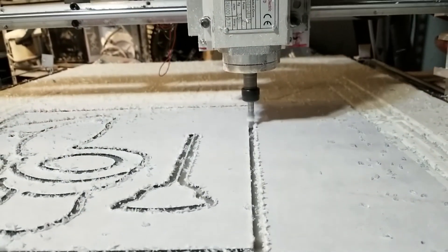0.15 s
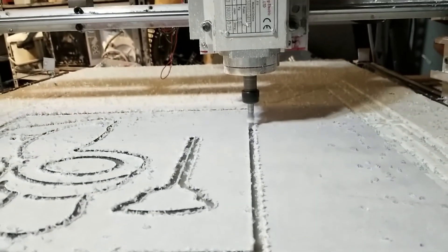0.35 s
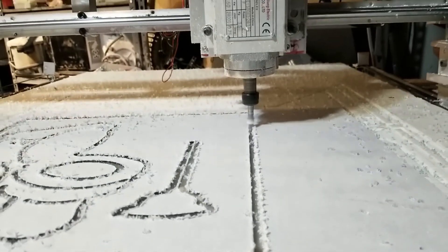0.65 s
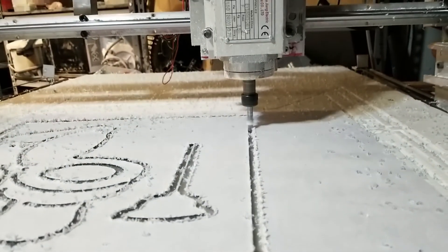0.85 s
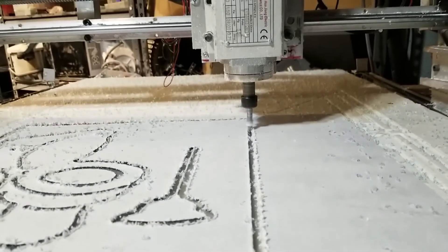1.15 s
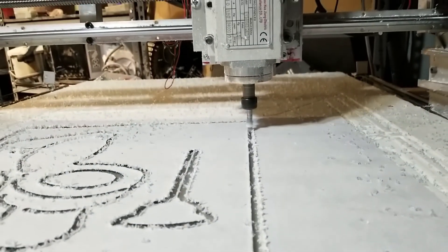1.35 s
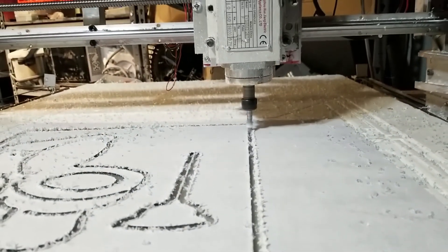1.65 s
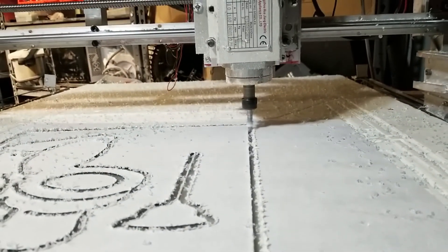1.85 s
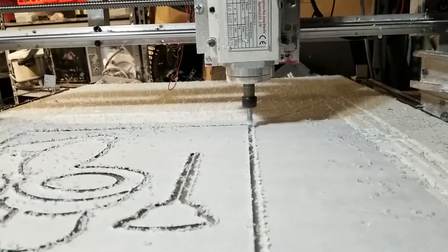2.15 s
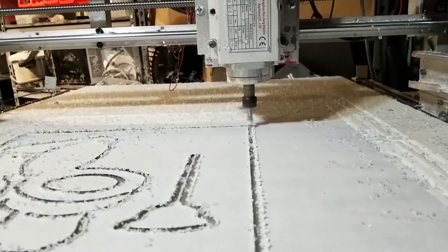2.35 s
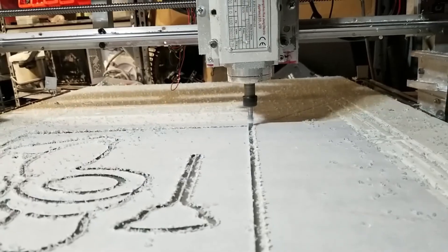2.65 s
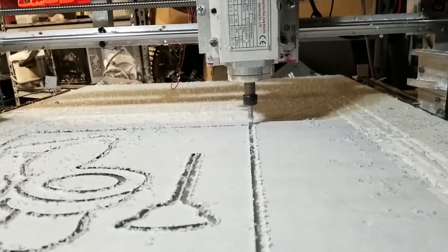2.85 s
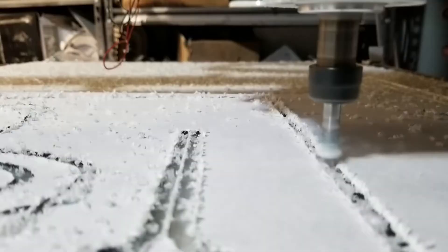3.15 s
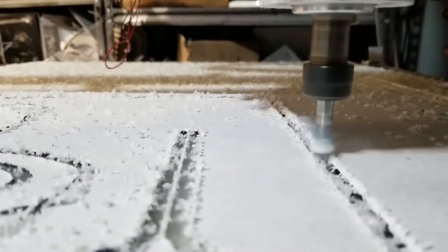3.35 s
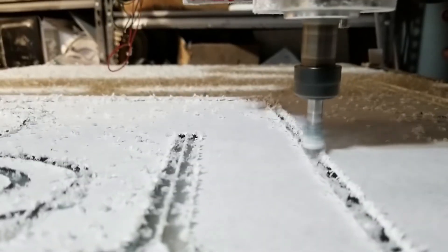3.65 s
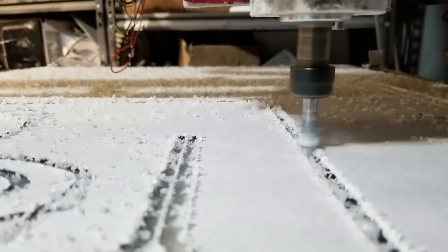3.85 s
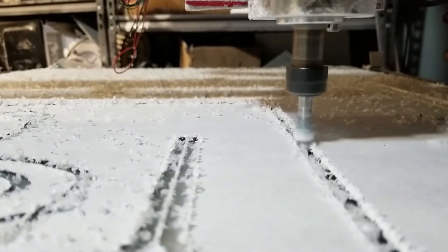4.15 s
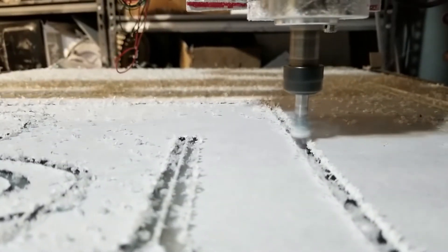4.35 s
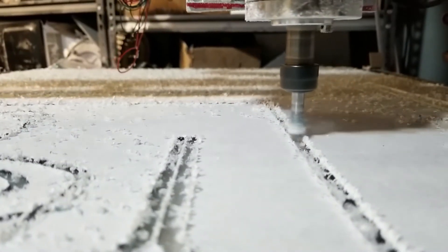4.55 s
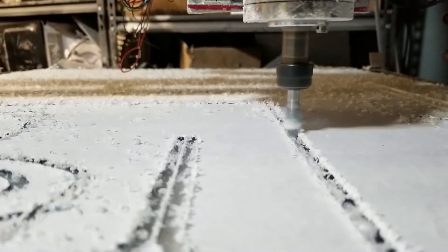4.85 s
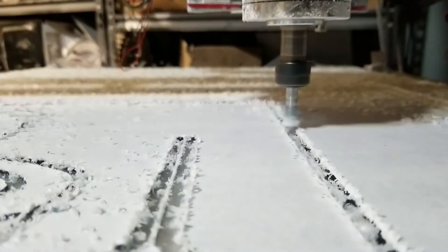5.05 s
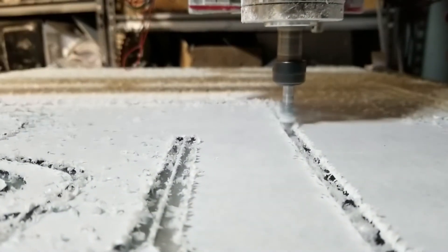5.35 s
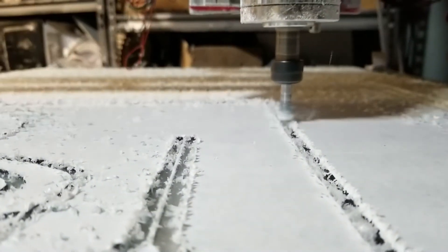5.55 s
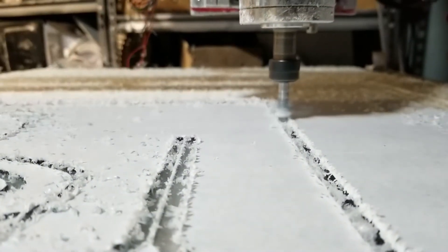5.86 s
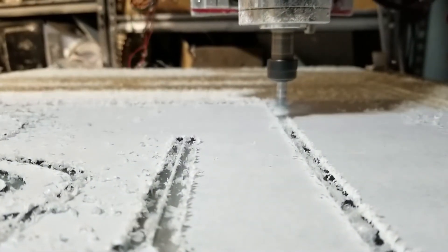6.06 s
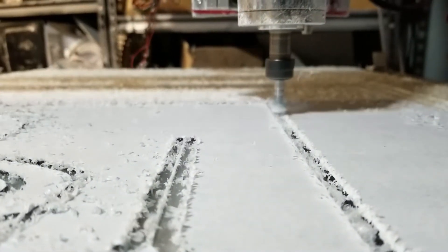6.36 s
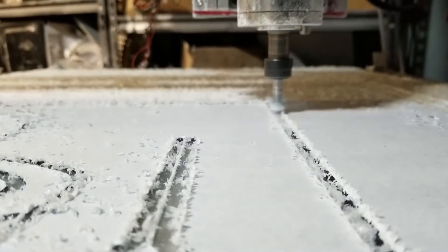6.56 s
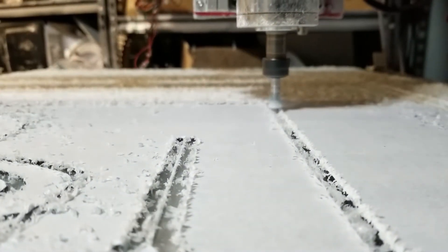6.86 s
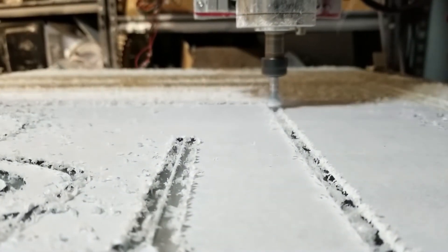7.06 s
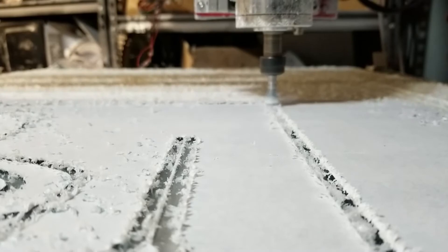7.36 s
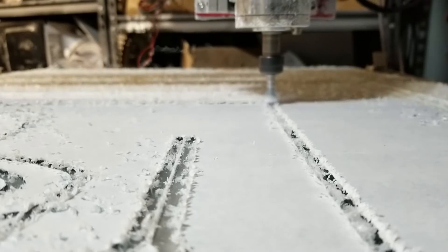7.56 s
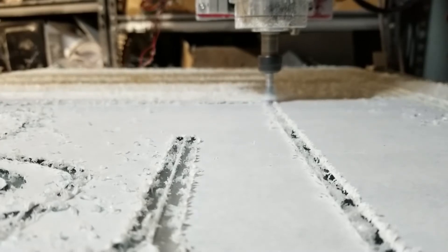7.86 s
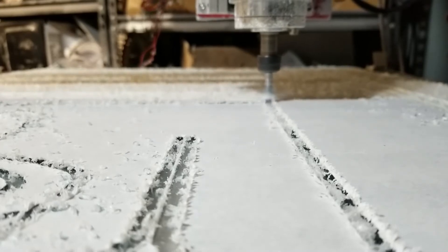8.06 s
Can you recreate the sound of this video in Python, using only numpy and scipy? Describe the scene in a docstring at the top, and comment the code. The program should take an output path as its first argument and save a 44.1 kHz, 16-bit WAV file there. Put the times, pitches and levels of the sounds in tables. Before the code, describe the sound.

From 0 s, heard a step away, a milling spindle hums near 262 hertz and whines strongly near 1050, with weaker overtones. Over it the cutter tears plastic in a bright, sizzling hiss, strongest about 4 to 14 kilohertz, buzzing and shuddering some 40 times a second. Two bites near 0.7 s and scattered chip snaps around 0.9-1.2 s tick sharply. From 2.05 to 2.55 s hard bites come in a rapid crackle; the hiss collapses, the whine sinks and axis motors moan softly until 3 s. At 3.04 s the perspective jumps close: full hiss returns, crisper and steadier, with wavering squeals around 5-6 kilohertz, isolated snaps and a slowly growing whine. Frame rumble and cooling air continue below, in short workshop reverberation. From 7.75 s the cut eases through faint bites; hiss and whine drop, leaving low moans, a small squeak at 8 s and thin ringing.

```python
"""Router milling a plastic panel

A CNC router mills a groove in a plastic panel in a small workshop, heard from a step away and then close by.
The turning spindle hums and whines in harmonics. Once per turn the cutter tears off a chip: a burst of
filtered noise, which surges as the gantry shudders, while modes of cutter and panel edge squeal.
Twice the cutter reaches a corner: it takes a few last bites, the hiss dies, axis motors and spindle moan.
Panel and frame resonate beneath, over cooling air and the short reverberation of the shop."""
import sys
import numpy as np
from scipy import signal
from scipy.fft import rfft, irfft, next_fast_len
from scipy.io import wavfile
from scipy.ndimage import uniform_filter1d

SR = 44100
rng = np.random.default_rng(int(sys.argv[2]) if len(sys.argv) > 2 else 0)


def unload_audio(sound):
    """Save the sound as a 16-bit wav file, at the path given as the first command line argument."""
    columns = np.transpose(np.atleast_2d(sound))
    # keep every value between -1 and 1, then stretch to whole-number steps
    steps = np.round(np.clip(columns, -1, 1) * 32767)
    wavfile.write(sys.argv[1], SR, steps.astype(np.int16))


N = 362502

TIME = np.arange(N) / SR
SIZE = next_fast_len(N)
BINS = np.maximum(np.arange(SIZE // 2 + 1) * SR / SIZE, 1)   # frequency of each bin, Hz
MOVE_CLOSE_S = 3.04   # the listening point jumps close to the cutter
SPEED_HZ, UNLOADED_RISE_HZ = (262.1, 262.85), 1.6   # turns per s under load (afar, close by); gain without load
CUTOFF_HZ, CEILING = 15750, .7


def tearing(angle, shake, surge=0.57, turn_db=(3.3, 2.2), decay_turns=0.2, rub=(.2, .36),
            second_flute=0.24, lead=0.33, thinnest=0.11, thickest=1.4):
    """Periodic cutting force: a burst per turn from the leading flute, a weaker one from the other, over rubbing."""
    quarter_period = round(SR / SHUDDER_HZ / 4)
    retreat = np.roll(shake, quarter_period)
    turns = np.maximum(angle - lead * retreat, 0) / (2 * np.pi)   # a retreating cutter meets the plastic later
    chance_per_turn = (2 * rng.random(N) - 1)[turns.astype(int)]
    strength = from_db(by_place(*turn_db) * chance_per_turn)
    leading = np.exp(-(turns % 1) / decay_turns)
    trailing = second_flute * np.exp(-((turns + .5) % 1) / decay_turns)
    chip_thickness = np.clip(1 + surge * shake * (1 - cornering()), thinnest, thickest)
    force = (by_place(*rub) + strength * (leading + trailing)) * chip_thickness
    return force / np.sqrt(uniform_filter1d(force ** 2, SR // 8))


# Colour of the chip noise. Each row: frequency in Hz, relative density in dB from afar, and close by.
CHIP_COLOUR = [(1320, -37, -21), (3100, -39, -6.5), (4330, -6.5, -5.5), (5180, -6.5, 3.5), (5900, -1, 1),
               (6850, -1, 3.5), (9100, 2, -0.5), (9160, 3.5, 5.5), (11780, 2.5, 4.5), (14200, -3.5, -4.5),
               (16200, -7, -8)]
HISS_LAG_S = (.000036, .000058)   # the hiss reaches the right side later (afar, close by)


def chips(force, hiss_db=4.0, patchy_db=3.0, grain_db=0.5, dust_db=10, slack_db=-8, crisp_hz=7800):
    """Amplitude-modulated noise: bands of hiss wander separately, pulsed by the force; fine dust brightens the top."""
    level_db, dust_tilt_db = cut_levels()
    far, close = (noise(colour(CHIP_COLOUR, axis=k + 1), lag_s=HISS_LAG_S[k], scatter=0.8) for k in range(2))
    hiss = by_place(rms_one(far), rms_one(close))
    spectrum = rfft(wandering(hiss), SIZE)
    centres, step = np.linspace(0, 16000, 13, retstep=True)
    steady, pulsed = 0, 0
    for hz in centres:
        triangle = np.maximum(1 - abs(BINS - hz) / step, 0)
        band = irfft(spectrum * triangle)[:, :N]
        top = np.clip((hz - 11000) / 3000, -.5, 1)
        band = band * from_db(patchy_db * drift(45) + top * (dust_tilt_db + dust_db))
        steady = steady + band
        sharpness = min((hz / crisp_hz) ** 2, 1)   # the highs crack with each chip, the mids just rub
        pulsed = pulsed + band * force ** sharpness
    running_rms = np.sqrt(uniform_filter1d(np.mean(steady ** 2, axis=0), SR // 20))
    evened = pulsed * from_db(grain_db * drift(1100)) / running_rms
    loudness = from_db(level_db + slack_db * cornering()) + bites()
    return evened * from_db(hiss_db) * loudness


# The straight cuts, one list from afar and one close by. Each row: time in seconds, base level of the chip
# hiss in dB, tilt of the fine-dust treble in dB before its swing is widened.
CUT_CURVES = [
    [(0.0, -23, -1), (0.17, -25.5, -2), (0.81, -22, -3.5), (0.87, -21.5, -3.5), (1.67, -25.5, -3.5),
     (1.9, -22.5, -7), (2.3, -23, -5), (2.39, -37, -6), (2.4, -32.5, -6)],
    [(3.07, -21.5, -2.5), (3.32, -24.5, -2.5), (4.96, -23.5, -3.5), (5.19, -24, -5), (5.44, -23.5, -4),
     (5.94, -26, -4), (6.05, -23, -3.5), (6.55, -23.5, -4), (7.2, -24.5, -4.5), (7.63, -27, -4.5),
     (7.72, -23.5, -4)],
]
CORNER_HISS_DB, CORNER_DUST_DB, PICK_UP_DB_PER_S = -19, -12, 28   # both fall in a corner; the hiss creeps back


def cut_levels(dust_swing=1.89, uneven_db=0.36):
    """Level envelopes in dB: hiss and dust fall in a corner, then the hiss creeps back; slight unevenness throughout."""
    level_db, dust_db = along_cuts(CUT_CURVES)
    free_s = by_place(*(np.clip(TIME - s - EASE_S, 0, .5) for s, _, _ in CORNERS))
    level_db = level_db + CORNER_HISS_DB * eased() + PICK_UP_DB_PER_S * free_s + uneven_db * drift(23.0)
    return level_db, dust_swing * dust_db + CORNER_DUST_DB * eased()


def wandering(x, wander_db=2.5, width_hz=560, hold_s=0.23, size=512):
    """Time-varying filtering: narrow bands of the hiss swell and fade as the cutter travels along the groove."""
    spectra = signal.stft(x, nperseg=size)[2]
    field = rng.standard_normal(spectra.shape[1:])
    spans = width_hz * size / SR, hold_s * SR / (size / 2)   # in bins and in frames
    for axis, span in enumerate(spans):
        for _ in range(2):
            field = uniform_filter1d(field, max(round(span), 1), axis=axis, mode="wrap")
    return signal.istft(spectra * from_db(wander_db * rms_one(field)), nperseg=size)[1][:, :N]


def chatter(x, overlap=0.62, hz=8000, width_hz=3800):
    """Regenerative comb filter: a flute recuts last turn's ripples, so mid hiss gathers between the harmonics."""
    one_turn_delay = np.exp(-2j * np.pi * BINS / np.mean(SPEED_HZ))
    recut = overlap * peak(hz, width_hz) * one_turn_delay
    return irfft(rfft(x, SIZE) * (1 - recut))[:, :N]


# Separate hard bites, most on the way into a corner. Each row: time in seconds, length in seconds,
# base peak level in dB, pitch in Hz.
HARD_BITES = [(0.6772, .012, -7, 7150), (0.7327, .008, -10, 6200), (2.0532, .013, -6, 9000),
              (2.2040, .012, -12, 9500), (2.2303, .009, -11, 9290), (2.2535, .012, -8, 9270),
              (2.2800, .008, -11, 8290), (2.3030, .012, -7, 9000), (2.3298, .012, -8, 10100),
              (2.3525, .012, -7, 7500), (2.3792, .009, -5, 8210), (2.4024, .011, -6, 9000),
              (2.4292, .015, -8, 7000), (2.4627, .007, -18, 7000), (2.4868, .011, -9, 9000),
              (2.5390, .008, -14, 7500), (7.7732, .012, -18, 8000), (7.8256, .013, -17, 8000),
              (7.8635, .009, -17, 8000), (7.9274, .007, -23, 8000)]


def teeth(strike_db=1.0, fade_db=0.5, uneven_db=0.5):
    """Repeated impact: during a bite the leading flute strikes once per turn, on average more weakly each time."""
    strikes = []
    for s, length_s, db, hz in HARD_BITES:
        for k in range(round(length_s * SPEED_HZ[0])):
            peak_db = db + strike_db - fade_db * k + uneven_db * rng.standard_normal()
            strikes.append((s + k / SPEED_HZ[0], peak_db, hz))
    return ticks(strikes, decay_s=0.0011, spread=0.29)


def bites(rub_db=-16, tail=1.0):
    """Asymmetric envelope: the rubbing in each bite starts hard and dies away more slowly."""
    total = 0
    for s, length_s, db, _ in HARD_BITES:
        attack = swell(s + 0.0022, 0.0022)
        decay = swell(s + 0.0016, tail * length_s)
        total = total + from_db(db + rub_db) * np.where(TIME < s + .002, attack, decay)
    return total


def cornering():
    """Gating: near 1 where the steady cut breaks up into separate bites, else 0."""
    return np.clip(sum(swell(s, .035) for s, *_ in HARD_BITES), 0, 1)


# Large chips snapping off. Each row: time in seconds, peak level in dB, pitch in Hz.
CHIP_SNAPS = [(0.875, -3, 11900), (1.013, -4, 9500), (1.017, -5, 8500), (1.113, -7, 8500),
              (1.163, -6, 8500), (1.191, -7, 8500), (1.2344, -9, 8270), (1.2383, -6, 8270),
              (1.8821, -9, 5590), (2.123, -5, 10000), (3.105, -3, 12500), (3.338, -9, 5700),
              (4.189, -3, 12000), (4.622, -4, 11100), (6.569, -8, 6070), (7.385, -9, 6190)]


def snaps():
    """Brittle fracture: a large chip breaks away with a short bright tick."""
    return ticks(CHIP_SNAPS, decay_s=.0007, spread=0.3)


LOWEST_CRACK_HZ = 5150   # the plastic cracks only above this


def ticks(rows, decay_s, spread):
    """Decaying band noise from rows of (s, peak dB, Hz); spread is the half bandwidth as a share of the pitch."""
    out, age = np.zeros((2, N)), TIME[:SR // 100]
    for s, db, hz in rows:
        edges = [max(hz / (1 + spread), LOWEST_CRACK_HZ), min(hz * (1 + spread), CUTOFF_HZ)]
        band = signal.butter(4, edges, "band", fs=SR, output="sos")
        both, *own = rng.standard_normal((3, len(age))) * np.exp(-age / decay_s)
        tick = signal.sosfilt(band, both + np.array(own))   # partly shared by the two sides
        at = round(s * SR)
        out[:, at:at + len(age)] += tick / abs(tick).max() * from_db(db)
    return out


# Modes of cutter and panel edge that squeal. Each row: frequency in Hz, split into a pair by plus and minus Hz,
# half width in Hz, level in dB from afar, level in dB close by, change in a corner in dB.
SQUEAL_MODES = [(5290, 0, 44, -40, -38, -7), (5624, -2, 85, -33, -32, -13), (6213, 130, 64, -37, -35, -12)]
# Flares as the cutter travels, one list per squealing mode. Each row: peak time in seconds,
# half length in seconds, added amplitude in dB.
SQUEAL_FLARES = [
    [(.77, .12, -42), (2.1, 0.087, -55), (6.75, 0.15, -34), (7.4, 0.57, -38)],
    [(.77, 0.067, -31), (2.1, 0.11, -39), (3.3, 0.098, -31), (5.0, 0.15, -35.5), (5.42, 0.096, -35),
     (6.17, 0.34, -37), (7.4, 0.28, -37)],
    [(2.164, 0.012, -22), (3.55, 0.26, -31), (4.17, 0.26, -25), (6.6, 0.4, -38), (7.37, 0.35, -37),
     (7.385, 0.0074, -19)],
]


def squeal(force, flicker_db=3.5, waver_db=0.2, follow=0.65, slack_db=-5, bite_db=-13):
    """Forced modal resonance: modes ring under the cutting force, rise and fall unevenly and flare now and then."""
    out, slack, kicks = 0, slack_db * cornering(), from_db(bite_db) * bites()
    for (hz, split_hz, width_hz, far, close, corner_db), flare_rows in zip(SQUEAL_MODES, SQUEAL_FLARES):
        level_db = by_place(far, close) + corner_db * eased() + slack + waver_db * drift(2.4)
        flares = sum(from_db(db) * swell(s, half_s) for s, half_s, db in flare_rows)
        ring = noise(peak(hz - split_hz, width_hz) + peak(hz + split_hz, width_hz))
        driven = rms_one(ring * force ** follow * from_db(flicker_db * drift(57)))
        out = out + driven * (from_db(level_db) + flares + kicks)
    return out


# Thin tones of the free-running cutter. Each row: frequency in Hz, relative level in dB.
FREE_TONES = [(2385, -7), (5297, 0), (5566, 1), (6347, -2), (7461, -3)]
SQUEAK = (8.0, .015)   # (s, half length s)


def free_ring(width_hz=7, level_db=-43, rise_s=0.051, squeak_db=-27, squeak_hz=5600, squeak_width_hz=900):
    """Narrow-band resonance: running free close by, the cutter squeaks once and rings on in thin steady tones."""
    modes = sum(from_db(db) * peak(hz, width_hz) for hz, db in FREE_TONES)
    onset = smooth_step(CORNERS[1][0] + EASE_S, rise_s)
    ring = rms_one(noise(modes)) * from_db(level_db) * onset
    squeak = rms_one(noise(modes * peak(squeak_hz, squeak_width_hz))) * from_db(squeak_db) * swell(*SQUEAK)
    return ring + squeak


# Imbalance hum at 1 per turn, one list from afar and one close by. Each row: time in seconds, base level in dB.
HUM_CURVES = [
    [(0.0, -36), (0.04, -29), (0.34, -34), (0.85, -30.5), (2.22, -35.5), (2.25, -45), (2.38, -48),
     (2.45, -38), (3.0, -31.5)],
    [(3.1, -40.5), (4.85, -35.5), (6.6, -33), (7.4, -39.5), (7.85, -43), (7.98, -47), (8.11, -42.5),
     (8.17, -33.5)],
]
# Weaker overtones. Each row: multiple of the speed, base level in dB from afar, and close by.
WEAK_OVERTONES = [(3, -53, -57.5), (5, -53, -50), (6, -59, -55), (7, -53, -61), (8, -52, -48),
                  (9, -62, -57), (10, -60, -60), (11, -59, -61), (12, -63, -60)]
# Overtones that change at one listening point as the cutter travels. Each row: peak time in seconds,
# half length in seconds, multiple of the speed, rise (or fall) in dB.
OVERTONE_SWELLS = [(.9, 1.5, 3, 12), (.4, 1.3, 6, 17), (2.2, .3, 7, 7), (2.6, .14, 5, 15),
                   (2.52, .14, 8, 10), (3.3, 1.7, 7, 23), (4.5, .8, 8, 6), (6.4, 1.0, 6, 4),
                   (8.0, .8, 8, -10)]
FLUTE_DB, FLUTE_EASED_DB = (-34.5, -61), -5.5   # flute tone at 2 per turn (afar, close by); change as the cut eases
FLUTE_DIP_S, FLUTE_DIP_HALF_S, FLUTE_DIP_DB = 2.337, 0.074, -21   # the flute tone dips briefly


def spindle(angle, shake, whine_db, strain_db, twist=0.076, hum_db=1.33, unsteady_db=0.78, flutter_db=3.5,
            rough_db=1.0, waver_db=2.0, overtone_db=-3, overtone_flutter_db=2.5, flute_flutter_db=1.35,
            spread=0.4):
    """Harmonic series of the rotation: the shaking load twists the phase and makes the partials flutter."""
    hum, = along_cuts(HUM_CURVES)
    flute = by_place(*FLUTE_DB) + FLUTE_EASED_DB * eased() + FLUTE_DIP_DB * swell(FLUTE_DIP_S, FLUTE_DIP_HALF_S)
    partials = [
        (1, hum + hum_db + unsteady_db * drift(7.6)),
        (2, flute + flute_flutter_db * shake + 2 * unsteady_db * drift(4.8)),
        (4, whine_db + flutter_db * shake + rough_db * drift(35)),
    ]
    throb = overtone_flutter_db * shake + ROCK_DB * rocking()
    for k, far, close in WEAK_OVERTONES:
        singing = 0
        for s, half_s, multiple, db in OVERTONE_SWELLS:
            if multiple == k:
                heard = by_place(s < MOVE_CLOSE_S, s > MOVE_CLOSE_S)
                singing = singing + db * swell(s, half_s) * heard
        level_db = by_place(far, close) + overtone_db + singing + strain_db + throb
        partials.append((k, level_db + waver_db * drift(5)))
    angle = angle + twist * shake + 0.015 * drift(25)
    sides = np.array([[.5], [-.5]])   # opposite phase offsets left and right
    return sum(np.sqrt(2) * from_db(db) * np.sin(k * angle + sides * spread * np.sqrt(k)) for k, db in partials)


WHINE_DB, WHINE_REST_DB = (-35, -33.5), -16   # at 4 per turn as a stretch begins (afar, close by); change at rest
WHINE_RISE_DB_PER_S = (1, 0.66)   # it grows as the cutter nears the corner (afar, close by)


def whine_level(strain_db, follow=0.79, waver_db=0.22, sinking=0.95):
    """Load-dependent level in dB: the whine grows along a cut, throbs into a corner, sinks at rest; a slight waver."""
    corner = WHINE_REST_DB * at_rest() ** sinking + ROCK_DB * rocking()
    stretch_s = TIME - by_place(0, MOVE_CLOSE_S)
    feeding = by_place(*WHINE_DB) + by_place(*WHINE_RISE_DB_PER_S) * stretch_s
    return feeding + corner + follow * strain_db + waver_db * drift(23.0)


# Bouts of slower sway. Each row: time of the widest swing in seconds, half length in seconds, depth.
SWAY_BOUTS = [(.588, .65, .75), (2.254, .42, .9), (3.538, .2, .3), (4.587, .35, .45), (5.613, .4, .35),
              (7.781, .2, .55)]
SHUDDER_HZ, SWAY_HZ, FIRST_SURGE_S = 40.0, 21.2, .011
SHUDDER_DEPTH, SHUDDER_AT_REST = (1.05, 0.44), 0.84   # 1 = full (afar, close by); share left at rest
SHUDDER_WANDER = (.15, 1.2)   # how far its timing strays, in radians (afar, close by)


def gantry(sway=0.94, jolts=0.27):
    """Structural vibration: steady shudder and bouts of sway push the cutter in and out; it calms at rest."""
    phase_wander = by_place(*SHUDDER_WANDER) * drift(0.88)
    fast = np.cos(2 * np.pi * SHUDDER_HZ * (TIME - FIRST_SURGE_S) + phase_wander)
    slow = 0
    for s, half_s, depth in SWAY_BOUTS:
        slow = slow + depth * swell(s, half_s) * np.cos(2 * np.pi * SWAY_HZ * (TIME - s))
    calm = 1 + (SHUDDER_AT_REST - 1) * at_rest()
    return calm * (by_place(*SHUDDER_DEPTH) * (fast + jolts * drift(42)) + sway * slow)


# The corners. Each row: time the cut starts to ease in seconds, time the feed starts to brake in seconds,
# braking time in seconds.
CORNERS = [(2.421, 2.62, 0.41), (7.746, 7.848, 0.033)]
EASE_S = .15   # how long the cut takes to die
ROCK_HZ, ROCK_DB = 14.74, 3.5


def eased():
    """Unloading ramp: 0 in a straight cut, 1 once the cutter runs free in a corner."""
    return by_place(*(smooth_step(s, EASE_S) for s, _, _ in CORNERS))


def at_rest():
    """Braking ramp: 0 while the gantry feeds, 1 once it stands in a corner."""
    return by_place(*(smooth_step(s, braking_s) for _, s, braking_s in CORNERS))


def rocking():
    """Inertial swing: the gantry rocks between -1 and 1 on its way into a corner."""
    swing = by_place(*(np.cos(2 * np.pi * ROCK_HZ * (TIME - s)) for s, _, _ in CORNERS))
    return swing * eased() * (1 - at_rest() ** 2)


def panel(shake, whine_db, hz=1038, width_hz=48, ring_db=(-9, -6), throb_db=-5.5):
    """Plate resonance: the sheet drums roughly in its main mode, as hard as the whine drives it."""
    return rms_one(noise(peak(hz, width_hz))) * from_db(whine_db + by_place(*ring_db) + throb_db * shake)


# Steady tones: feed motors, except that 565 and 1275 Hz are shudder sidebands of spindle harmonics.
# Each row: frequency in Hz, base level in dB from afar, and close by.
STEADY_TONES = [(75, -61.5, -65.5), (167, -61, -62), (565, -60, -59), (1275, -60, -54), (2686, -56, -55.5)]
# Moans and rumbles in the corners: axis motors passing through resonances, except that 1315 Hz is the spindle's
# throbbing fifth overtone and 1035 and 1058 Hz its lingering, returning whine.
# Each row: peak time in seconds, half length in seconds, frequency in Hz, width in Hz, level in dB.
CORNER_MOANS = [(2.59, .12, 1315, 30, -43), (2.52, .13, 2060, 60, -45), (2.74, .07, 1100, 30, -41),
                (2.905, .05, 987, 7, -30), (2.90, .05, 1240, 9, -45), (2.87, .08, 468, 9, -39.5),
                (2.92, .12, 398, 3, -41.5), (2.68, .2, 370, 70, -43), (2.92, .1, 162, 8, -47.5),
                (8.05, .25, 390, 70, -46), (7.88, .07, 150, 15, -52), (7.94, .04, 490, 20, -46),
                (7.93, .1, 680, 60, -46), (7.89, .025, 1035, 4, -41), (8.07, .075, 1058, 2, -39),
                (8.02, .1, 527, 12, -49), (8.13, .09, 730, 65, -44)]


def drones_and_moans(strain_db, waver_db=3.5):
    """Tonal excitation: motors and shudder sidebands sound steadily; in corners motors and spindle moan or rumble."""
    out = 0
    for hz, far, close in STEADY_TONES:
        level_db = by_place(far, close) + strain_db + waver_db * drift(2.2)
        out = out + from_db(level_db) * np.sin(2 * np.pi * hz * TIME + hz / 1500 * drift(2.6))
    for s, half_s, hz, width_hz, db in CORNER_MOANS:
        if width_hz < 10:   # a tone with wandering pitch
            ring = np.sin(2 * np.pi * np.cumsum(hz + width_hz * drift(width_hz)) / SR)
        else:
            ring = rms_one(noise(peak(hz, width_hz))) / np.sqrt(2)
        out = out + from_db(db) * swell(s, half_s) * ring
    return np.sqrt(2) * out


# Resonances of frame and bed. Each row: frequency in Hz, half width in Hz, base density at the peak in dB per Hz
# from afar, and close by.
FRAME_MODES = [(281, 50, -65, -69.5), (502, 62, -64, -72), (718, 132, -70, -68), (1298, 90, -66, -65),
               (1591, 81, -68.5, -67.5), (1840, 51, -64.5, -68), (2046, 65, -64, -66.5),
               (2154, 32, -78, -64.5), (2900, 220, -69.5, -77)]
# Cooling air and shop rumble. Each row: frequency in Hz, base density in dB per Hz from afar, and close by.
AIR_COLOUR = [(15, -95, -106), (50, -84, -99), (131, -81, -92), (232, -86, -72), (354, -87, -76),
              (400, -93, -83.5), (600, -69, -75.5), (905, -73.5, -93), (1420, -73, -73),
              (1680, -77.5, -79.5), (2400, -72.5, -71), (2650, -74, -75.5), (3800, -78.5, -78),
              (5260, -74.5, -70), (7900, -76.5, -79), (16000, -85, -78)]


def frame(shake, strain_db, throb_db=4.0, air_share=0.58):
    """Modal superposition: frame and bed rumble, throbbing with the gantry, over the rush of cooling air."""
    rumbles = []
    for k in (2, 3):   # level columns
        power = sum((from_db(row[k]) * peak(row[0], row[1])) ** 2 for row in FRAME_MODES)
        rumbles.append(noise(np.sqrt(power)))
    rumble = by_place(*rumbles) * from_db(strain_db + throb_db * np.tanh(shake))
    air = by_place(noise(colour(AIR_COLOUR, axis=1)), noise(colour(AIR_COLOUR, axis=2)))
    return rumble + air * from_db(air_share * strain_db)


STRAIN_PER_HUM, STRAIN_REST_DB = 0.16, (-2, -4.5)   # dB per dB of hum; change at rest (afar, close by)


def frame_strain():
    """Imbalance excitation, in dB: the shaking of frame and bed follows the hum and drops at rest."""
    hum, = along_cuts(HUM_CURVES)
    usual = by_place(*(np.median(np.array(rows)[:, 1]) for rows in HUM_CURVES))
    return STRAIN_PER_HUM * np.maximum(hum - usual, -6) + by_place(*STRAIN_REST_DB) * at_rest()


def workshop(x, wet_db=-12, t60=0.15):
    """Reverberation: a short diffuse tail, decaying by 60 dB in t60 seconds, follows the direct sound."""
    age = TIME[:SR // 2]
    tail = rng.standard_normal((2, len(age))) * from_db(-60 * age / t60) * (age > .004)
    tail /= np.sqrt(np.sum(tail ** 2, axis=1, keepdims=True))
    return x + from_db(wet_db) * signal.fftconvolve(x, tail, axes=1)[:, :N]


# Stereo coherence of the noises. Each row: frequency in Hz, likeness of left and right from 0 to 1.
SIDE_LIKENESS = [(30, 0.95), (150, 0.32), (300, 0.58), (700, 0.36), (1050, 0.64), (1600, 0.05),
                 (3000, 0.31), (6000, 0.094), (9500, 0.52), (12500, 0.36), (16000, 0.4)]


def noise(gain, lag_s=0., scatter=0., echo_s=0.000688):
    """Partly coherent noise of given gain per Hz: the right may lag, its phase rippled by an echo off the bed."""
    alike = np.clip(np.interp(BINS, *np.transpose(SIDE_LIKENESS)), 0, 1)
    mid, side = rfft(rng.standard_normal((2, SIZE))) * gain * np.sqrt([1 + alike, 1 - alike])
    late = np.exp(-1j * (2 * np.pi * BINS * lag_s + scatter * np.sin(2 * np.pi * BINS * echo_s)))
    return irfft(np.array([mid + side, (mid - side) * late]))[:, :N] * np.sqrt(SR) / 2


def drift(rate_hz):
    """Low-pass noise: smooth chance of rms 1 that changes at about the given rate."""
    return rms_one(irfft(rfft(rng.standard_normal(SIZE)) * peak(0, rate_hz))[:N])


def peak(hz, width_hz):
    """Resonance curve: gain per bin, halved at width_hz from the centre."""
    return 1 / (1 + ((BINS - hz) / width_hz) ** 2)


def colour(points, axis=1):
    """Spectral envelope: gain per bin from a column of dB points over log frequency."""
    table = np.array(points)
    return from_db(np.interp(np.log(BINS), np.log(table[:, 0]), table[:, axis]))


def swell(s, half_s):
    """Gaussian envelope: a bell-shaped rise and fall of height 1."""
    return np.exp(-np.minimum(((TIME - s) / half_s) ** 2, 50))


def smooth_step(s, length_s):
    """Linear ramp: 0 before the given moment, then a straight rise to 1."""
    return np.clip((TIME - s) / length_s, 0, 1)


def by_place(far, close):
    """Crossfade: the far value before the listening point moves, the close one after it."""
    closeness = np.clip((TIME - MOVE_CLOSE_S) / .02 + .5, 0, 1)
    return far * (1 - closeness) + close * closeness


def in_time(rows):
    """Linear interpolation: curve rows to one value per sample for each column."""
    s, *columns = np.transpose(rows)
    return [np.interp(TIME, s, c) for c in columns]


def along_cuts(curves):
    """Joined envelopes: columns of a far and a close curve, crossfaded where the listening point moves."""
    return [by_place(far, close) for far, close in zip(*map(in_time, curves))]


def from_db(db):
    """Logarithmic level: decibels to amplitude gain."""
    return 10 ** (np.asarray(db) / 20)


def rms_one(x):
    """Normalisation to unit rms."""
    return x / np.sqrt(np.mean(x ** 2) + 1e-20)


def scene():
    """Common excitation: rotation and gantry shake drive the tones, the cut and the frame together."""
    speed_hz = by_place(*SPEED_HZ) + UNLOADED_RISE_HZ * eased()
    angle = 2 * np.pi * np.cumsum(speed_hz) / SR
    shake, strain_db = gantry(), frame_strain()
    force, whine_db = tearing(angle, shake), whine_level(strain_db)
    cut = chatter(chips(force)) + squeal(force) + teeth() + snaps()
    cutting = workshop(cut) + free_ring()
    tones = spindle(angle, shake, whine_db, strain_db) + panel(shake, whine_db)
    machine = tones + drones_and_moans(strain_db) + frame(shake, strain_db)
    return (cutting + machine) * from_db([[.25], [-.25]])   # left slightly louder


def record(dry):
    """Clipping and low-pass filtering: peaks above the ceiling are clipped, then the top is cut."""
    low_pass = signal.ellip(12, .1, 90, CUTOFF_HZ, fs=SR, output="sos")
    return signal.sosfilt(low_pass, np.clip(dry, -CEILING, CEILING))


dry = scene()
out = record(dry)
unload_audio(out)
```